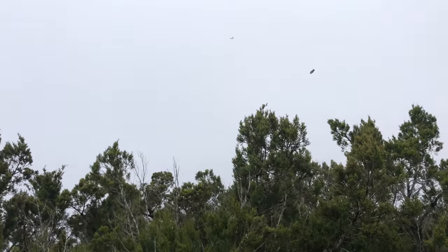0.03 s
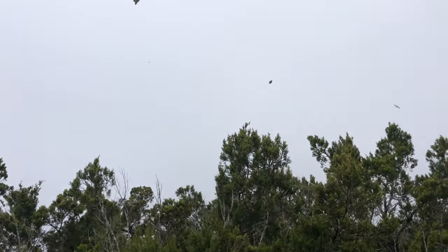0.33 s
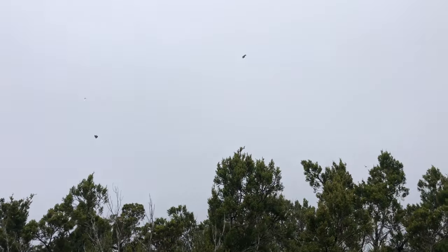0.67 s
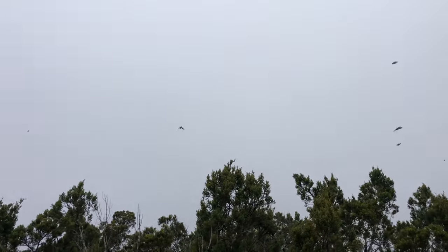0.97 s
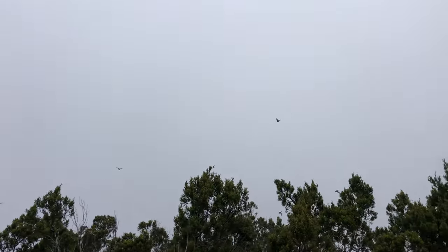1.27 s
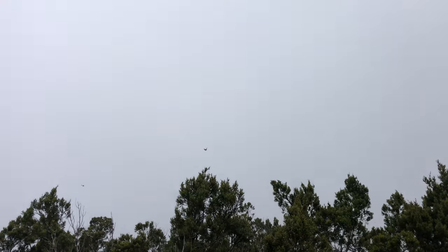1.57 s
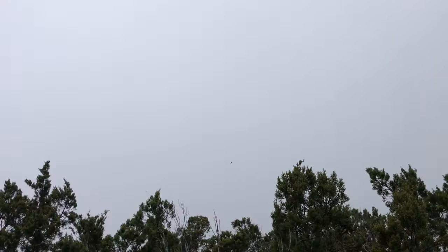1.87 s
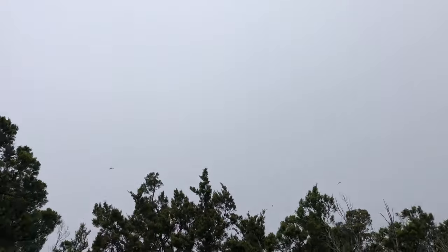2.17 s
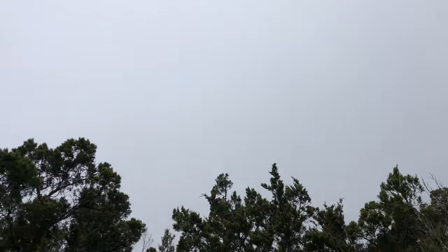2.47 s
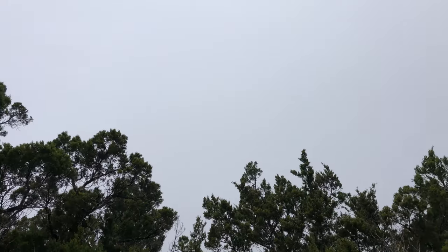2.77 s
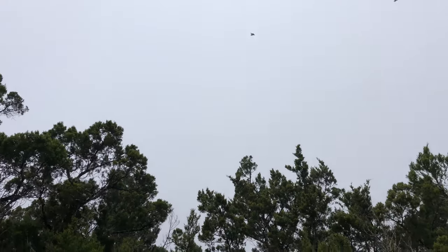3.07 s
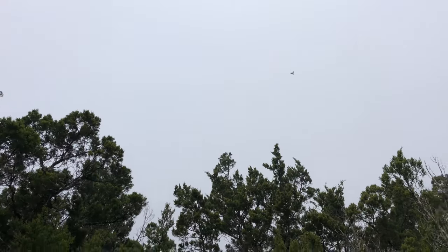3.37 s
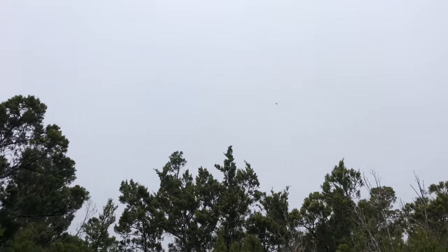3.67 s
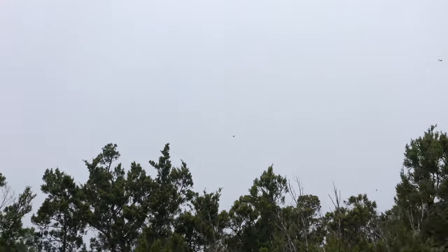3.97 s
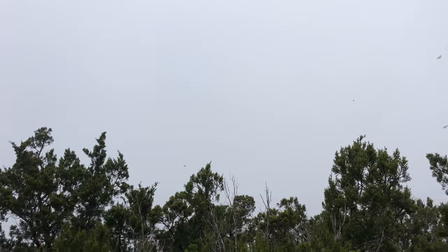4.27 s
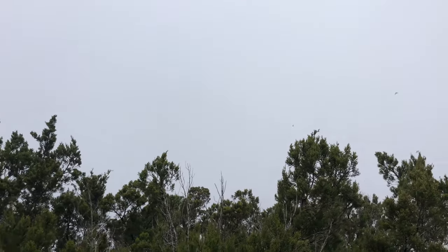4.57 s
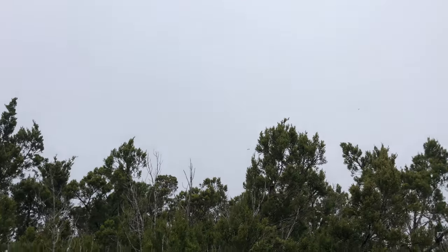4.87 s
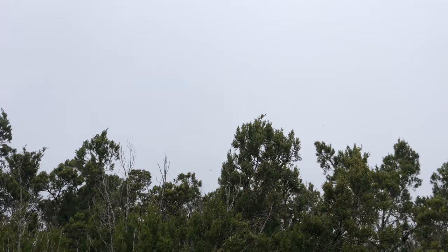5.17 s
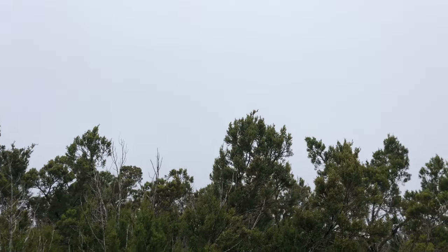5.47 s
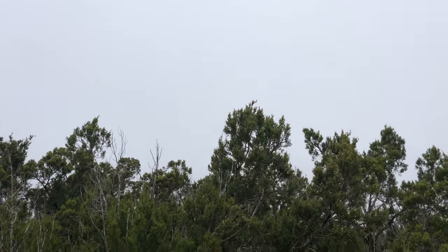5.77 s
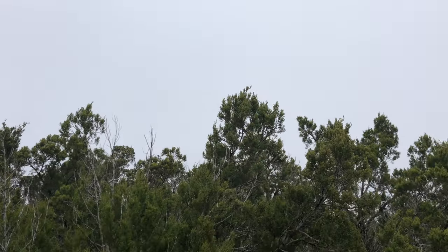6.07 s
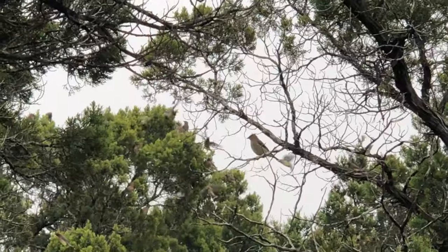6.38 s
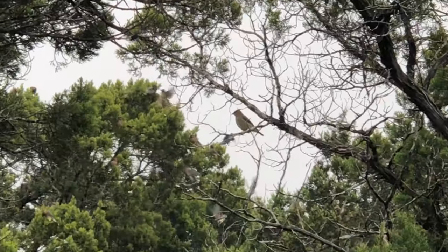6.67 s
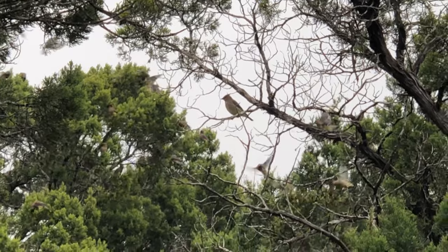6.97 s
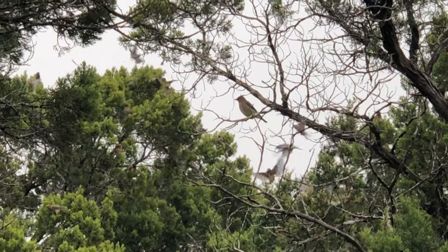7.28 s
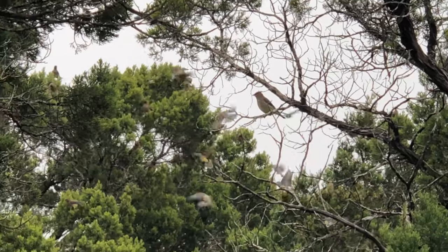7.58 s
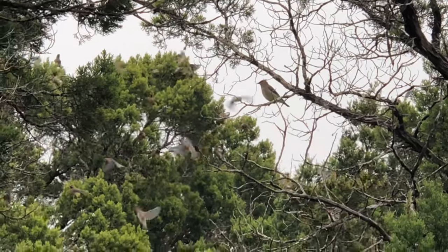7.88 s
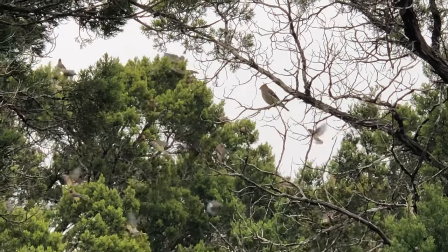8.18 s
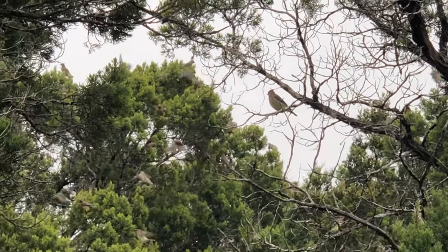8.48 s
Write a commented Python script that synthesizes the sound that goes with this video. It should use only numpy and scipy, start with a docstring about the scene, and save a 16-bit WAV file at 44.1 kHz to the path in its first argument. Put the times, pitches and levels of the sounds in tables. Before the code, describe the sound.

Small birds trade thin, high whistles over low wind, then sound closer, with wings ticking against twigs and soft microphone bumps.

```python
"""A flock of small birds trades thin, high, arching whistles among evergreens, over a far roar and low wind.
Each call is a gliding near-sine, echoed by branches and scattered by trunks and foliage.
At 6.18 s the scene jumps close to their tree: louder whistles, a few lower chirps, wings ticking
against twigs, soft low bumps on the microphone and the whirr of a passing bird."""
import sys
import numpy as np
from scipy import signal
from scipy.fft import rfft, irfft, next_fast_len
from scipy.io import wavfile
from scipy.ndimage import map_coordinates

SR = 44100
rng = np.random.default_rng(int(sys.argv[2]) if len(sys.argv) > 2 else 0)


def unload_audio(sound):
    """Save the sound as a 16-bit wav file, at the path given as the first command line argument."""
    columns = np.transpose(np.atleast_2d(sound))
    # keep every value between -1 and 1, then stretch to whole-number steps
    steps = np.round(np.clip(columns, -1, 1) * 32767)
    wavfile.write(sys.argv[1], SR, steps.astype(np.int16))


N = 376173
TIME = np.arange(N) / SR
JUMP_S = 6.18

# Spectrum of feather on twig: freq_hz, gain_db
TWIG_SPECTRUM = [(500, -49), (2000, -0.5), (3500, 2.5), (6000, 3.5), (9000, 2), (12000, -4.5), (15500, 4)]


def amp(db):
    """Decibels to gain."""
    return 10 ** (np.asarray(db) / 20)


def unit(x):
    """Scale to rms 1."""
    return x / np.sqrt(np.mean(x ** 2) + 1e-20)


def add(mix, start_s, sound):
    """Mix in at start_s, which may be negative."""
    at = round(start_s * SR)
    sound = sound[max(0, -at):]
    part = mix[max(0, at):][:len(sound)]
    part += sound[:len(part)]


def colour(x, spectrum):
    """Filter by (freq_hz, gain_db) points."""
    hz, db = np.transpose(spectrum)
    bins_hz = np.fft.rfftfreq(len(x), 1 / SR)
    gain = amp(np.interp(np.log(bins_hz + 1), np.log(hz), db))
    return irfft(rfft(x) * gain, len(x))


def noise(spectrum):
    """Coloured noise, rms 1."""
    return unit(colour(rng.standard_normal(next_fast_len(N)), spectrum)[:N])


def drift(rate_hz, size=N):
    """Smooth random curve, rms about 1."""
    at = np.arange(size) * rate_hz / SR
    return map_coordinates(rng.standard_normal(2048), [at % 2047], order=2, mode="mirror")


def jump_gain(open_db, close_db):
    """Gain step from the open to the tree."""
    return amp(np.where(TIME < JUMP_S, open_db, close_db))


def stir():
    """Foliage motion: 1 at first, settling to 0."""
    return np.interp(TIME, [0.29, 1.7], [1, 0])


def trees(x, t60_s, wet_db):
    """Trunks and foliage scatter sound into a thin tail."""
    t = np.arange(SR // 2) / SR
    taps = rng.standard_normal(len(t)) * (rng.random(len(t)) < 1500 / SR)
    taps *= amp(-60 * t / t60_s) * (t > .003)
    return x + amp(wet_db) * signal.fftconvolve(x, taps / np.linalg.norm(taps))[:N]


def note(length_s, start_hz, crest_hz, end_hz, crest_share, db, buzz=0, flick_in=0, flick_out=.4):
    """Bird voice: a near-sine swells as it glides to a crest, then fades with a pitch flick."""
    flick_s, ramp_s = 0.01378, 0.0081
    t = np.arange(int(length_s * SR)) / SR
    progress, crest = t / length_s, np.clip(crest_share, .05, .95)
    climb = np.maximum(1 - progress / crest, 0)
    fall = np.maximum((progress - crest) / (1 - crest), 0)
    onset = (1 - flick_in) * climb ** 1.9 + flick_in * np.exp(-t / flick_s)
    ending = (1 - flick_out) * fall ** 2 + flick_out * np.exp((t - length_s) / flick_s)
    hz = crest_hz - (crest_hz - start_hz) * onset - (crest_hz - end_hz) * ending
    waver = (.002 + .008 * climb ** 2) * drift(169.1, len(t))
    hz *= 1 + waver + buzz * drift(340, len(t))
    phase = 2 * np.pi * np.cumsum(hz) / SR
    edges = np.clip(np.minimum(t, length_s - t) / ramp_s, 0, 1)
    level_db = db - 6.5 * onset - 5 * ending + 3 * drift(72.6, len(t))
    return edges * amp(level_db) * (np.sin(phase) + amp(-35) * np.sin(2 * phase))


def calls(rows, voice, echo_db=-12):
    """Calls in one voice; two close branch echoes beat against each glide."""
    out = np.zeros(N)
    for (start_s, *shape), delays_s in zip(rows, rng.uniform(0.0035, .03, (len(rows), 2))):
        sound = voice(*shape)
        add(out, start_s, sound)
        for delay_s in delays_s:
            add(out, start_s + delay_s, amp(echo_db) * sound)
    return out


def whistle(length_s, climb_hz, top_hz, drop_hz, db, buzz=0, climb_s=.175):
    """The flock's call: flick up, high arch, flick down."""
    return note(length_s, top_hz - climb_hz, top_hz, top_hz - drop_hz, climb_s / length_s, db, buzz,
                flick_in=.43, flick_out=.55)


def near_whistles():
    """The nearer birds trade whistles."""
    # start_s, length_s, climb_hz, top_hz, drop_hz, level_db
    whistles = [ (-.1, 0.21, 708, 6730, 250, -67), (.02, 0.23, 793, 7050, 100, -71),
                (.19, 0.11, 794, 6960, 0, -75), (.34, 0.12, 600, 6550, 0, -77),
                (.45, .35, 790, 6520, 250, -78), (1.24, .27, 504, 7440, 102, -82),
                (1.25, 0.16, 250, 6800, 0, -78.5), (1.42, 0.21, 398, 7130, 200, -72),
                (1.51, 0.31, 666, 6730, 253, -78), (1.685, 0.212, 841, 6610, 80, -73.5),
                (1.78, 0.11, 550, 6380, 0, -85), (2.125, 0.17, 600, 6730, 0, -81),
                (2.3, 0.22, 302, 7060, 150, -80), (2.803, 0.35, 610, 7030, 379, -68),
                (2.97, 0.16, 719, 6740, 50, -67), (3.45, 0.27, 397, 6490, 62, -74.5),
                (3.64, 0.21, 438, 7180, 100, -75.5), (3.84, 0.32, 760, 6890, 100, -77),
                (4.04, 0.43, 712, 6800, 520, -74), (4.14, 0.32, 304, 7200, 250, -80),
                (4.805, 0.36, 980, 6910, 653, -61.5), (4.85, 0.25, 451, 7240, 250, -70),
                (5.08, 0.31, 360, 7260, 300, -71.5), (5.29, 0.51, 714, 6890, 149, -73.5),
                (5.72, .35, 455, 7100, 480, -69), (5.815, 0.22, 890, 6700, 60, -74),
                (6.18, 0.054, 30, 6850, 346, -59.5), (6.18, 0.11, 101, 7020, 150, -67),
                (6.265, 0.4, 1200, 6894, 395, -62), (6.417, 0.36, 892, 7223, 295, -54),
                (6.417, 0.42, 795, 6920, 850, -61), (6.73, 0.133, 50, 7200, 20, -63),
                (6.907, 0.41, 1250, 7040, 303, -59), (7.157, 0.29, 1002, 6850, 552, -59),
                (7.507, 0.16, 913, 6500, 2, -64), (7.68, 0.19, 200, 7180, 100, -73),
                (7.843, 0.48, 1100, 6890, 504, -58), (8.225, .14, 943, 6590, 0, -69),
                (8.32, .4, 860, 7090, 300, -64.5)]
    return calls(whistles, whistle)


def chorus(count=90):
    """Rest of the flock: faint random whistles over a blur of farther ones."""
    # freq_hz, gain_db
    flock_spectrum = [(3000, -80), (5500, -29), (6200, -5.5), (6750, -4), (7150, 3), (7500, -27),
                      (8300, -49), (11000, -70)]
    out = noise(flock_spectrum) * amp(-3.5 + 2 * drift(14))
    for k, (when, length, pitch, rise, size) in enumerate(rng.random((count, 5))):
        sound = whistle(length_s=.24 + .16 * length, climb_hz=550 + 450 * rise,
                        top_hz=6480 + 720 * pitch, drop_hz=300, db=6 * (size - .5), buzz=.005)
        add(out, (k + when - 1) / count * N / SR, sound)
    return out * jump_gain(-84, -75)


def rustle(flicker_db=3):
    """Distant wing flutter: three broad bands of fizz, each flickering on its own."""
    bands = [noise([(hz * 0.88, -30), (hz, 0), (hz * 2.7, -30)]) * amp(flicker_db * drift(70))
             for hz in np.geomspace(3500, 5000, 3)]
    return unit(sum(bands)) * jump_gain(-90 + 10 * stir(), -98)


def roar(lift_db=2):
    """Far roar, swelling slowly in the open."""
    # freq_hz, gain_db
    spectrum = [(60, -11), (200, -5), (330, -2), (600, -0.5), (1000, -1.5), (1300, -7), (1600, -13.5),
                (2000, -21.5), (2800, -33), (5000, -48), (9000, -70)]
    # Slow swell: time_s, level_db
    contour = [(0.1, -57), (0.15, -57.5), (1.29, -56.5), (3.26, -59.5), (4.95, -57.5), (6.1, -58)]
    open_db = np.interp(TIME, *np.transpose(contour))
    return noise(spectrum) * jump_gain(open_db, -62) * amp(lift_db + 0.43 * drift(16))


def wind():
    """Low, lumpy wind."""
    # freq_hz, gain_db
    spectrum = [(15, -49), (30, -43), (42, -1.5), (60, -3.5), (82, -1), (125, -5.5), (180, -10),
                (260, -13.5), (500, -33.5), (2000, -95)]
    return noise(spectrum) * jump_gain(-57.5, -57) * amp(drift(5.8))


def leaves():
    """Foliage hiss, louder while astir and by the tree."""
    # freq_hz, gain_db
    spectrum = [(500, -1), (2000, 10), (3500, 8.5), (5000, 6), (8000, 3), (11000, 0), (15000, -2.5)]
    return noise(spectrum) * jump_gain(-80 + 5 * stir(), -74) * amp(1.4 * drift(30))


def feather_crackle(ring_s=0.0013):
    """Feathers brush foliage: fine random clicks, thickening in flurries."""
    # start_s, length_s, level_db
    flurries = [(6.25, .11, -77), (7.01, 0.15, -71.5), (7.318, .085, -72), (7.45, .14, -70.5),
                (7.69, 0.074, -71)]
    open_per_s, calm_per_s, flurry_per_s = 76.5, 136, 391
    flurry = sum(amp(db) * ((TIME > start_s) & (TIME < start_s + length_s))
                 for start_s, length_s, db in flurries)
    rate_per_s = np.where(TIME < JUMP_S, open_per_s * stir(),
                          np.where(flurry > 0, flurry_per_s, calm_per_s))
    rate_per_s *= amp(3.1 * drift(40))
    sizes = amp(3 * np.minimum(rng.exponential(1, N), 2.5))
    strikes = sizes * (rng.random(N) < rate_per_s / SR)
    force = np.maximum(flurry, jump_gain(-73.5, -74))
    envelope = signal.lfilter([1], [1, -np.exp(-1 / (ring_s * SR))], strikes * force)
    return envelope * noise(TWIG_SPECTRUM)


def wing_ticks(ring_s=0.00053):
    """Wings strike twigs: single snaps of noise."""
    # start_s, peak_db, cutoff_hz
    ticks = [(.17, -54, 6000), (.19, -55.5, 5500), (.38, -53, 6000), (.83, -49, 2510), (1.08, -56.5, 4500),
             (6.206, -47, 9000), (6.278, -55, 15000), (6.337, -47, 15000), (6.622, -45, 15000),
             (6.716, -51, 15000), (6.733, -50.5, 6000), (7.001, -52, 15000), (7.021, -48, 14000),
             (7.035, -52, 13900), (7.061, -55, 15000), (7.116, -50, 15000), (7.32, -49, 15000),
             (7.338, -52, 15000), (7.353, -42.5, 16000), (7.37, -44, 6500), (7.386, -51, 14000),
             (7.454, -49, 15000), (7.465, -51, 15000), (7.522, -46, 15000), (7.695, -49, 15000),
             (7.711, -50, 14000), (7.911, -50, 15000)]
    out = np.zeros(N)
    t = np.arange(1024) / SR - .002
    for start_s, peak_db, cutoff_hz in ticks:
        snap = rng.standard_normal(len(t)) * np.exp(-abs(t) / ring_s) * (t > 0)
        tick = colour(colour(snap, TWIG_SPECTRUM), [(cutoff_hz, 0), (2 * cutoff_hz, -36)])
        add(out, start_s + t[0], amp(peak_db) * tick / abs(tick).max())
    return out


def drone(pitch_hz=470):
    """A faint, wavering far tone that swells three times."""
    # centre_s, half_width_s, level_db
    swells = [(0.277, 0.1, -58.5), (0.68, 0.18, -57.5), (1.245, 0.2, -57)]
    envelope = sum(amp(db) * np.exp(-((TIME - centre_s) / half_s) ** 2) for centre_s, half_s, db in swells)
    envelope *= amp(2 * drift(14.5))
    hz = pitch_hz * (1 + 0.0122 * drift(30.26))
    return envelope * np.sin(2 * np.pi * np.cumsum(hz) / SR)


def near_chirps():
    """Quicker, buzzy calls, mostly below the whistles."""
    # start_s, length_s, start_hz, crest_hz, end_hz, crest_share, level_db, buzz_share
    chirps = [(.38, 0.079, 3280, 3450, 3350, .5, -80, .04), (.635, .06, 4220, 4350, 4250, 0.46, -78, 0.028),
              (1.22, .07, 4650, 4770, 4700, 0.46, -79, .02), (1.46, 0.19, 5000, 3430, 3300, 1, -81, 0.028),
              (3.47, 0.17, 4570, 4770, 4620, .5, -82, .04), (3.53, .095, 7700, 7900, 7800, .43, -81, 0.037),
              (4.73, 0.16, 7700, 7800, 7800, 0.6, -77, 0.03),
              (6.19, .17, 3930, 4380, 4380, 0.55, -67, 0.048),
              (6.5, 0.11, 2730, 4000, 3530, 0.43, -62.5, .005),
              (6.752, 0.065, 3100, 3860, 3830, 0.704, -61.5, 0.006),
              (8.25, 0.23, 7800, 7830, 9700, 0.12, -75.5, 0.018)]
    return calls(chirps, note)


def far_chirps(count=22):
    """Other birds deep in the trees: faint random chirps, sweeping up or down."""
    out = np.zeros(N)
    for when, length, pitch, sweep, size in rng.random((count, 5)):
        hz, glide_hz = 3300 + 1500 * pitch, 900 * (sweep - .5)
        chirp = note(0.04 + 0.12 * length, hz - glide_hz, hz, hz + glide_hz,
                     crest_share=0.56, db=-86.5 - 6 * size, buzz=0.011)
        add(out, when * N / SR, chirp)
    return out


def swell(u):
    """Envelope peaking at 1 when u = 1."""
    return u ** 2 * np.exp(2 - 2 * u)


def thud(t, hz, rise_cycles=1.15, sag=0.37, rough=0.36):
    """A few low cycles that swell, sink in pitch and die."""
    u = t * hz / rise_cycles
    sinking_hz = hz * (1 + sag * (2 * np.exp(-u / 2) - 1))
    phase = 2 * np.pi * np.cumsum(sinking_hz) / SR
    return swell(u) * (np.sin(phase) + rough * drift(3.51 * hz, len(t)))


def bumps(scuff_rise_s=0.0051, body_hz=78.6, body_gain_db=21.5, body_lag_s=0.0124):
    """Microphone bumps: scuff and thud; the camera body answers with the square of the bump."""
    # start_s, thud_db, pitch_hz, scuff_db
    contacts = [(6.186, -36.5, 99, -45), (6.1986, -26, 167, -41), (6.245, -31.5, 216, -38),
                (6.252, -29.5, 93, -45), (6.271, -28, 136, -47.5), (6.368, -43, 91, -76),
                (6.452, -41.5, 108, -66), (7.002, -45, 114, -70), (7.04, -37.5, 154, -64),
                (7.276, -42.5, 235, -58.5), (7.338, -38, 172, -55), (7.357, -44, 200, -52),
                (7.394, -39, 150, -50), (7.407, -35.5, 257, -42), (7.421, -39, 86, -52),
                (7.56, -42.5, 96, -59), (8.216, -42.5, 166, -55)]
    # freq_hz, gain_db
    scuff_spectrum = [(60, -8), (200, 0.5), (320, 2.5), (450, -1.5), (600, -10), (900, -22.5), (2000, -65)]
    # freq_hz, gain_db
    bass_rolloff = [(25, -10), (55, -1)]
    out = np.zeros(N)
    t = np.arange(SR // 6) / SR
    for start_s, thud_db, pitch_hz, scuff_db in contacts:
        scuff = swell(t / scuff_rise_s) * unit(colour(rng.standard_normal(len(t)), scuff_spectrum))
        add(out, start_s, amp(thud_db) * thud(t, pitch_hz) + amp(scuff_db) * scuff)
        add(out, start_s + body_lag_s, amp(body_gain_db) * amp(thud_db) ** 2 * thud(t, body_hz))
    return colour(out, bass_rolloff)


def whirr(centre_s=7.82, half_width_s=0.2, level_db=-61.5, wingbeat_hz=17):
    """A bird passes: one low puff of air per wingbeat."""
    # freq_hz, gain_db
    spectrum = [(120, -20), (240, -5), (360, 2), (480, -17), (900, -42)]
    beats = 1 + 0.36 * np.sin(2 * np.pi * wingbeat_hz * TIME + drift(6))
    passing = np.exp(-((TIME - centre_s) / half_width_s) ** 2)
    return noise(spectrum) * beats * amp(level_db) * passing


def scene():
    """Birds and wings among the trees, open air and bumps; mono."""
    whistles = trees(near_whistles() + chorus(), t60_s=0.79, wet_db=-10.5)
    chirps = trees(near_chirps() + far_chirps(), t60_s=0.36, wet_db=-7.5)
    flight = trees(feather_crackle() + wing_ticks(), t60_s=0.23, wet_db=-9) + whirr()
    air = rustle() + roar() + wind() + leaves() + drone()
    return (whistles + chirps + flight + air + bumps())[None]


def record(dry):
    """Microphone bass cut, then a steep band limit."""
    low_hz, high_hz = 36, 15880
    bass_cut = signal.butter(4, low_hz, "high", fs=SR, output="sos")
    band_limit = signal.firwin(511, high_hz, window=("kaiser", 9), fs=SR)
    return signal.oaconvolve(signal.sosfilt(bass_cut, dry), band_limit[None], "same")


dry = scene()
out = record(dry)
unload_audio(out)
```